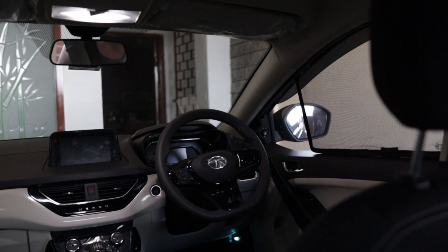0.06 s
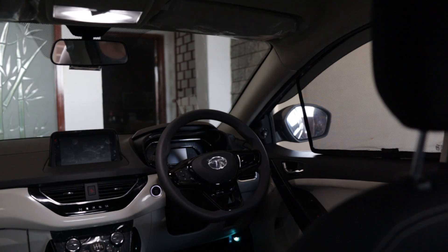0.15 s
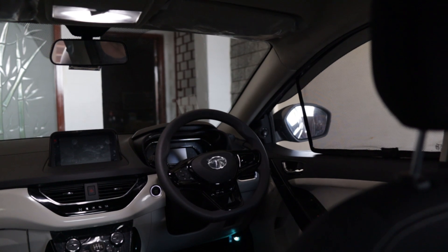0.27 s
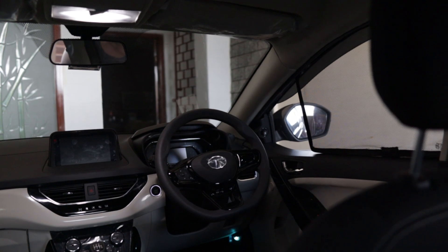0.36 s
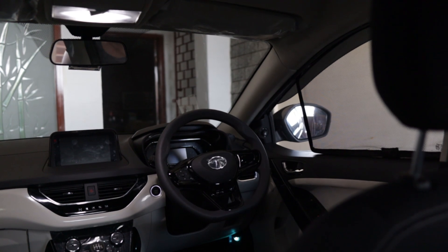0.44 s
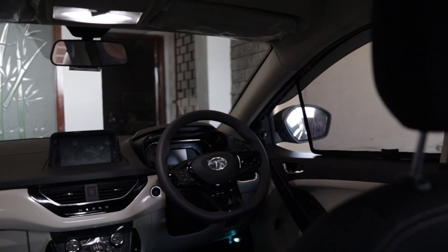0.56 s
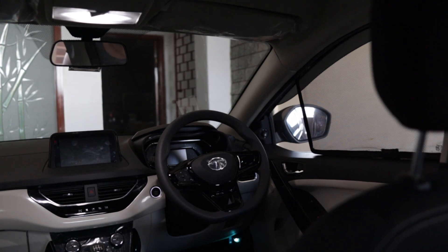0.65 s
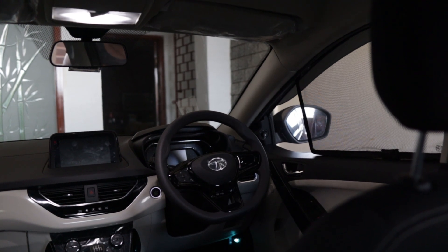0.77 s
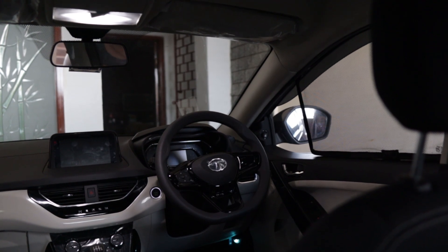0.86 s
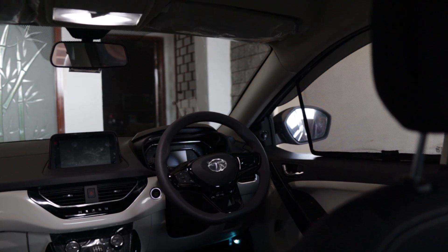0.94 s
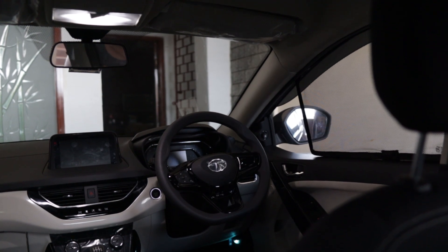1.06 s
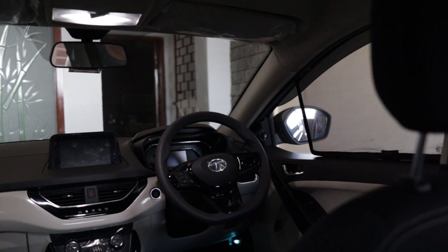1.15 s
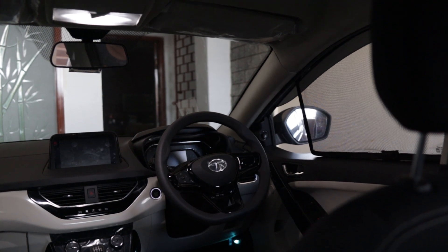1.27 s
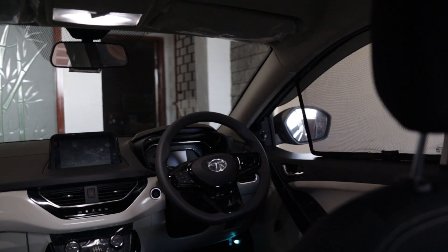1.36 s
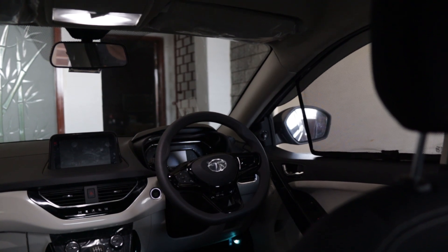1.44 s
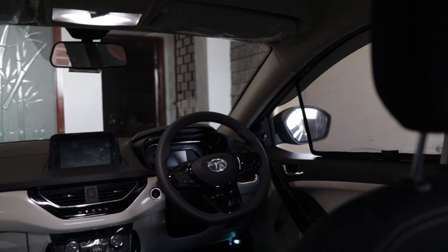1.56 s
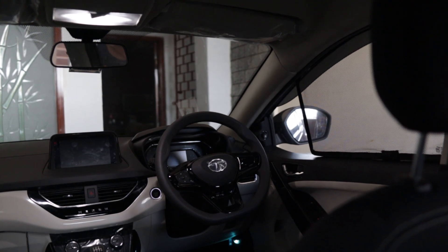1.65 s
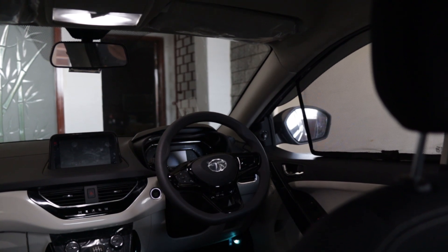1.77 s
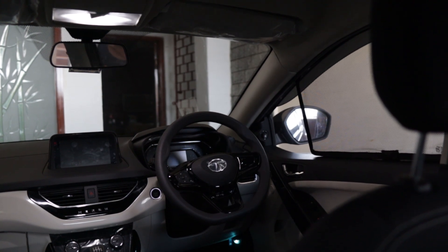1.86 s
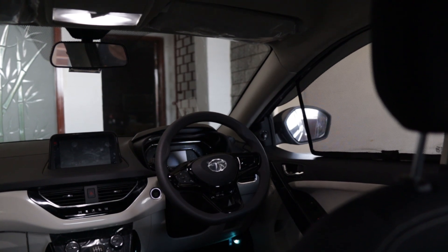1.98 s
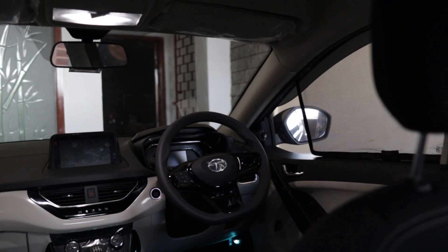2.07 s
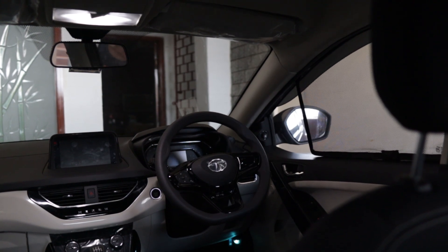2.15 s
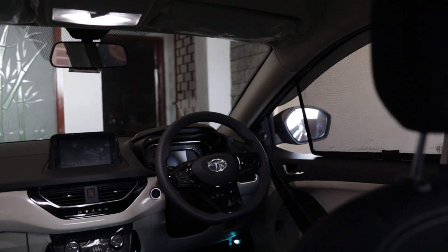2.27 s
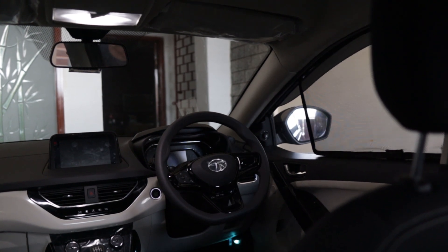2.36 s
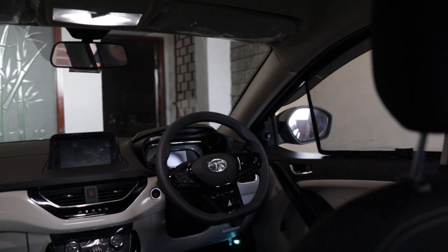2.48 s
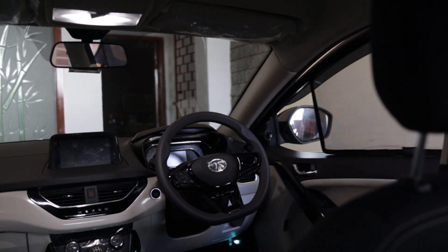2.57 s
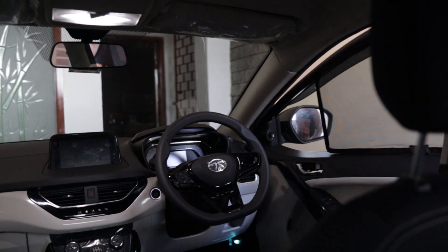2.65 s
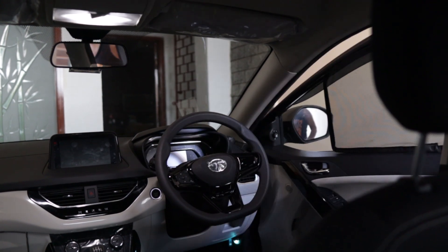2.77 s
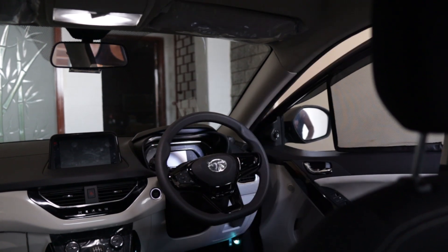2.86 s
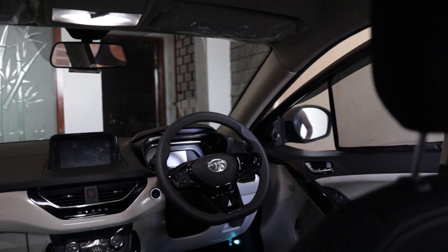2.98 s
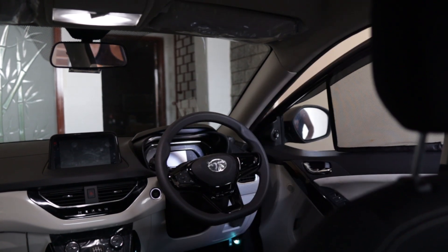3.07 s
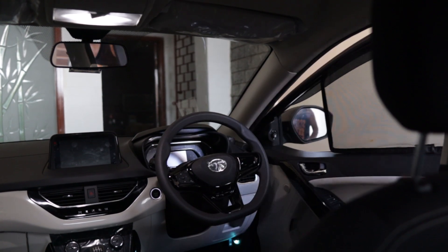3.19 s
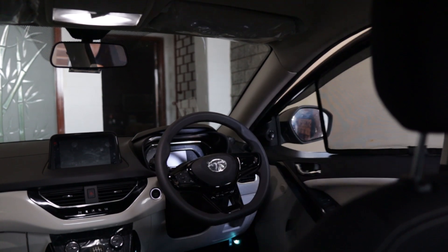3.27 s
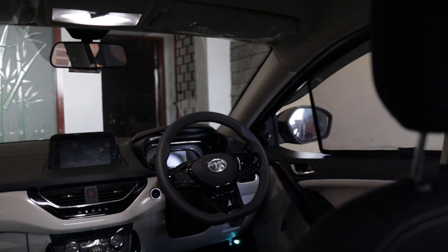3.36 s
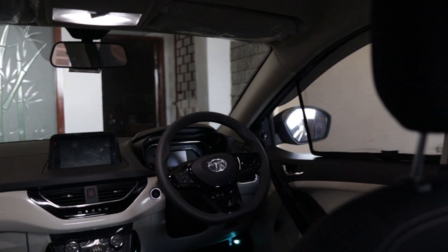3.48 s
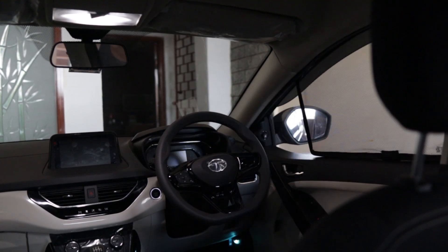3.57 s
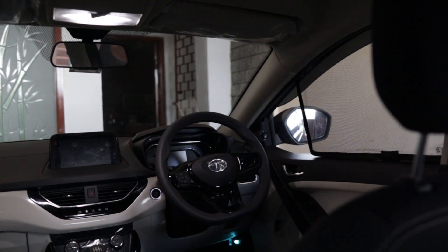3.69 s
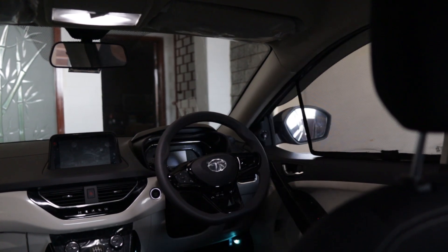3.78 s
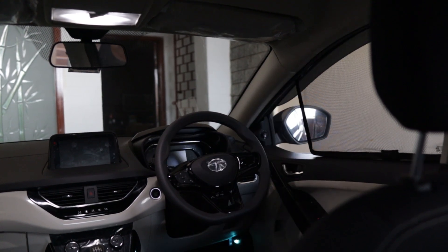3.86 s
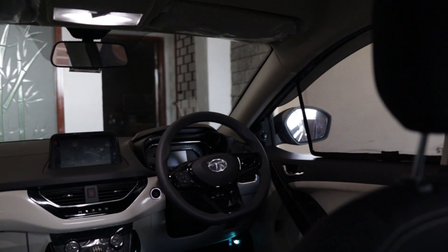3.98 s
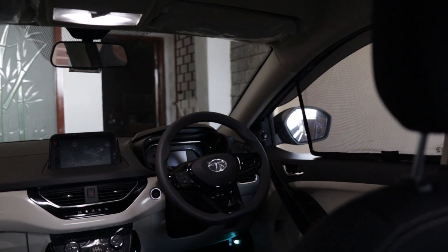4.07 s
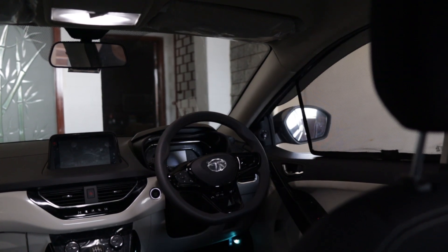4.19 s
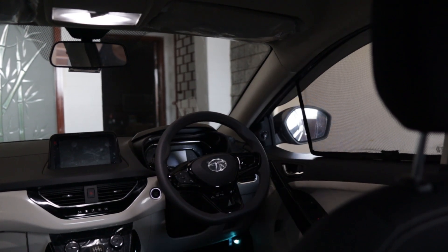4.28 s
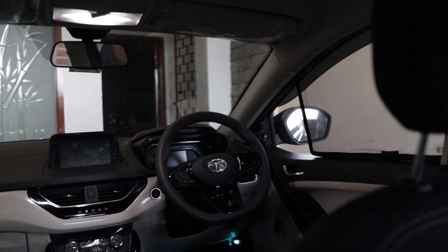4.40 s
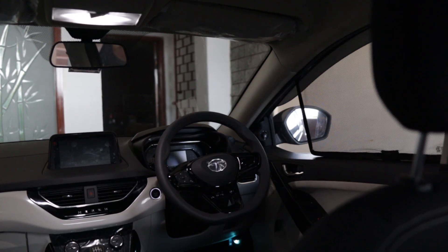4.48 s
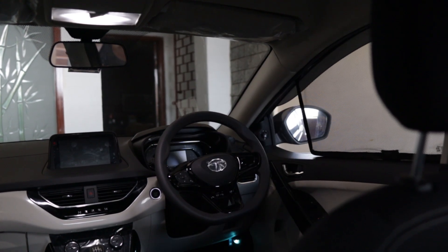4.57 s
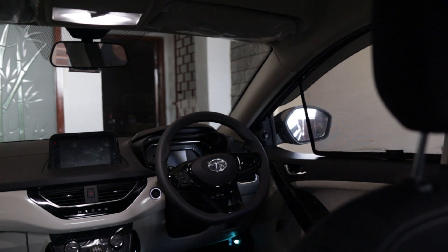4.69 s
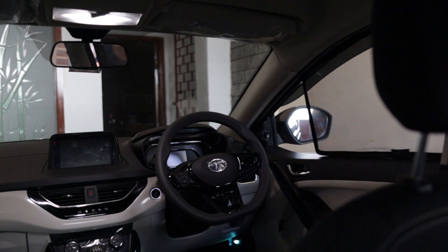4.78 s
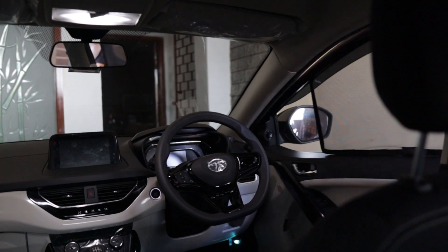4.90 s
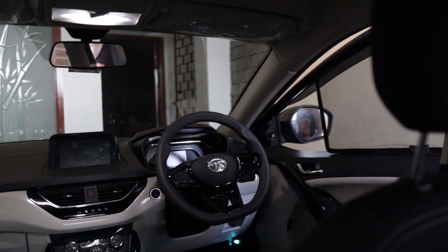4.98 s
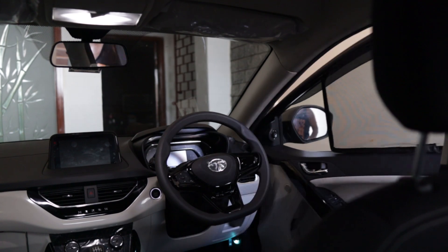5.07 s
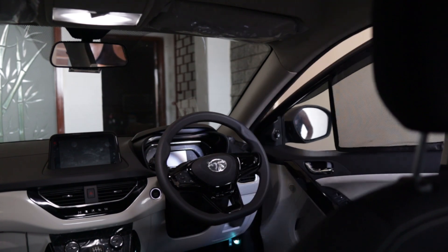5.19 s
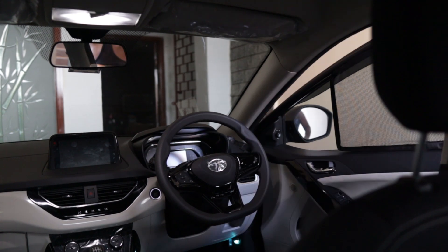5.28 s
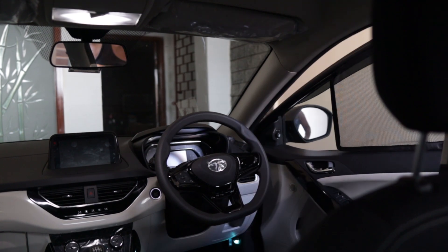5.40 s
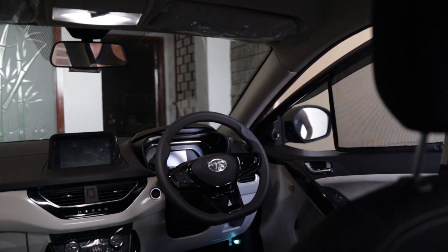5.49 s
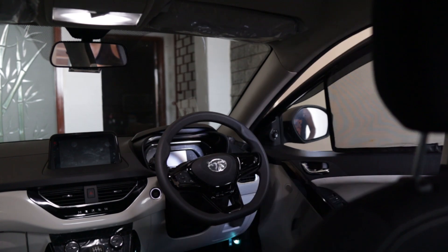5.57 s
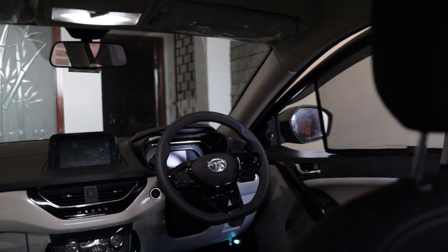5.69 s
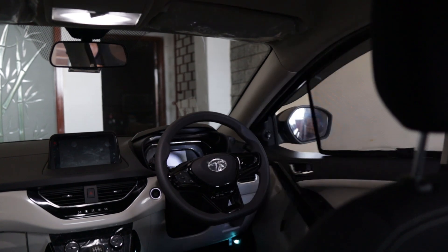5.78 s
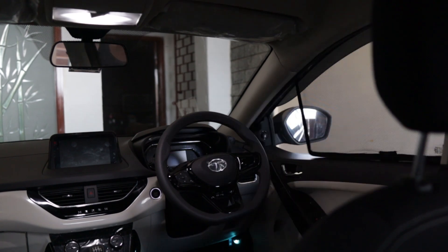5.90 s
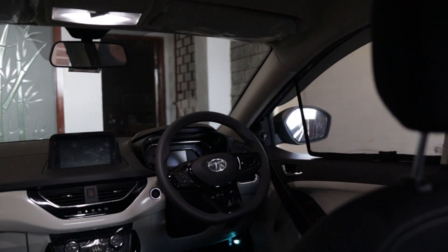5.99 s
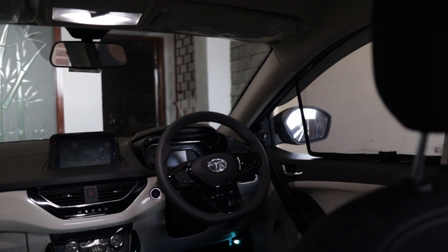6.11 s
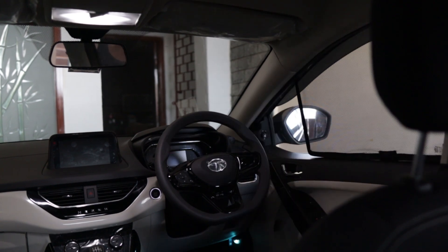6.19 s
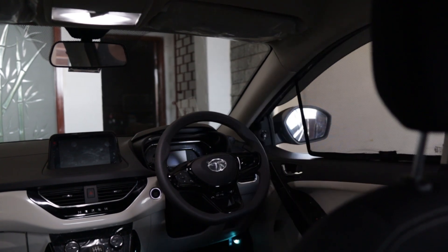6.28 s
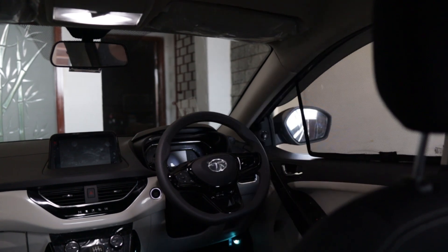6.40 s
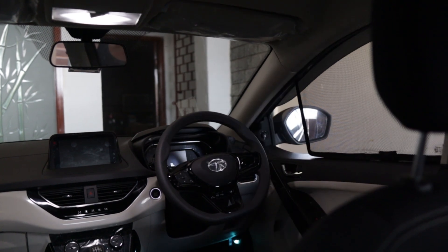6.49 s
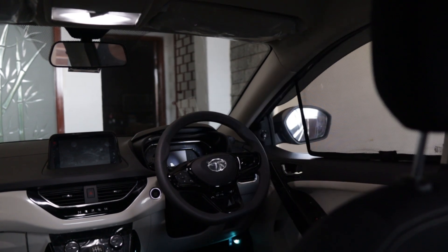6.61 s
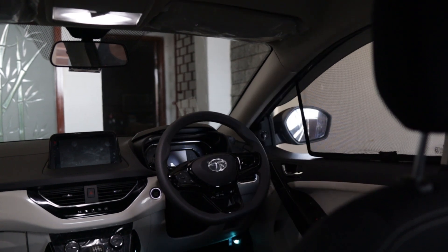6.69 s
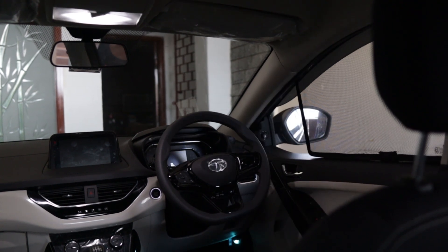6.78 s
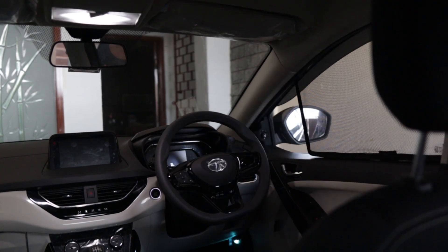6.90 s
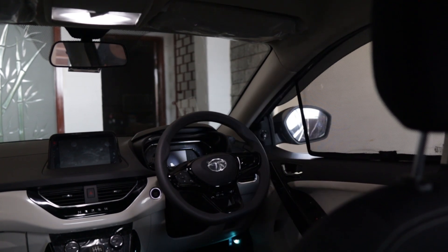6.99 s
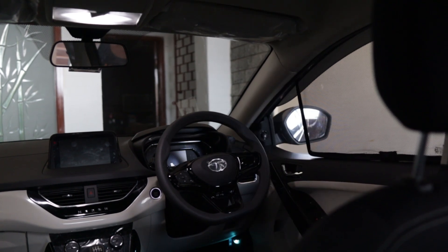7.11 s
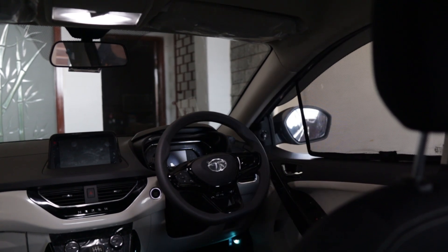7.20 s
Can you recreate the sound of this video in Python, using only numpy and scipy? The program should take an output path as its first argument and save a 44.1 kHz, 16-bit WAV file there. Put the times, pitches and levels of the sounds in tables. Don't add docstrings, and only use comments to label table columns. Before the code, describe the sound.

The microphone sits inside a small, padded parked car. At 0 s the end of an earlier door slam thuds and rattles lightly, its low boom fading within about half a second. Quiet cabin hum and faint hiss remain until 2.1 s, when soft handle knocks and seal bumps begin; around 2.4 s the latch releases with a dull clunk and faint street murmur enters. Small bumps continue to 3.3 s. At 3.6 s the door slams: clustered hard metallic impacts, deep body thump, brief panel ring and a loose rattle, over by about 4 s. Handle and latch clunks return at 4.6-4.9 s, with gentle opening bumps and slightly clearer murmur from 5.1 s. At 6.0 s a harder slam cracks and booms, distorting flatly, followed by rapid rattling until 6.3 s and a low fading rumble. Soft, muffled knocks come at 6.9 and around 7.15 s.

```python
import sys
import numpy as np
from scipy import signal
from scipy.fft import rfft, irfft
from scipy.io import wavfile
from scipy.ndimage import uniform_filter1d

SR = 44100
rng = np.random.default_rng(int(sys.argv[2]) if len(sys.argv) > 2 else 0)


def gain_from_decibels(decibels):
    exponent = np.asarray(decibels, float) / 20
    return 10 ** exponent


def inscribe(sig):
    pcm = np.round(np.clip(np.atleast_2d(sig).T, -1, 1) * 32767)
    wavfile.write(sys.argv[1], SR, pcm.astype(np.int16))


N = 319725

# (frequency [Hz], level [dB])
SNAP = [(2200, -10), (3000, -5), (4400, -9), (5500, -14.5), (7000, -28)]


def evened(x):
    return x / np.sqrt(np.mean(x ** 2) + 1e-20)


def peaked(x):
    return x / abs(x).max()


def add(mix, s, sound):
    at = round(s * SR)
    part = mix[max(at, 0):][:len(sound) + min(at, 0)]
    part += sound[max(-at, 0):][:len(part)]


def colour(x, points, edge_db=-14):
    hz, db = np.transpose(points)
    octave = np.log2(np.fft.rfftfreq(len(x), 1 / SR) + 1)
    known = np.log2(hz)
    outside = abs(octave - np.clip(octave, known[0], known[-1]))
    gain = gain_from_decibels(np.interp(octave, known, db) + edge_db * outside)
    return irfft(rfft(x) * gain, len(x))


def resonate(x, hz, width):
    pole = np.exp((2j * hz - width) * np.pi / SR)
    return 2 * signal.lfilter([1 - abs(pole)], [1, -pole], x).real


def modes(x, table):
    return sum(gain_from_decibels(db) * evened(resonate(x, hz, width)) for hz, width, db in table)


def rung(hits, table):
    out = 0
    for hz, width, db in table:
        once = resonate(hits, hz, width)
        out = out + gain_from_decibels(db) * peaked(resonate(once, hz, 3.4 * width))
    return out


def strike(t, rise, t60, bend=1.0):
    swell = (1 - np.exp(-t / rise)) ** 2
    return peaked(swell * gain_from_decibels(-60 * (t / t60) ** bend))


def spray(t, grit_db=1.5):
    grit = rng.exponential(1, len(t) // 32).repeat(32)
    return rng.standard_normal(len(t)) * gain_from_decibels(grit_db * grit)


def burst(x, shape):
    shaped = x * shape
    return shaped * np.linalg.norm(shape) / np.linalg.norm(shaped)


def knocks(table, bright, rise, ring_db, ring_width, edge_db, octave_db=0.0, bend=1.0):
    # (frequency [Hz], level [dB])
    dull = [(200, 8.5), (350, 0.5), (600, -0.5), (900, -6.5)]
    middle = [(800, 0.5), (1300, 3), (1800, 2), (2600, -8)]
    out, t = np.zeros(N), np.arange(8192) / SR
    for s, db, middle_db, treble_db, hz, t60 in table:
        hits = spray(t)
        ring = [(hz, ring_width, ring_db + octave_db * np.log2(hz / 400))]
        sound = rung(hits * strike(t, rise, 0.7 * t60), ring)
        parts = (-7.0, dull, 1), (middle_db - 9.5, middle, .9), (treble_db - 7.5, bright, .8)
        for part_db, tone, length in parts:
            shape = strike(t, rise, length * t60, bend)
            sound = sound + gain_from_decibels(part_db) * burst(colour(hits, tone, edge_db), shape)
        add(out, s - rise, gain_from_decibels(db) * sound)
    return out


def slams():
    # (time [s], peak [dB], middle re peak [dB],
    # treble re peak [dB], ringing part [Hz])
    first = [(0.0, -22, -1, -21, 360), (0.016, -30, 1, -1, 348), (0.05, -19, -2, -12, 343),
             (0.083, -17.5, -26, -17, 734), (3.575, -29, -11, -24, 342), (3.588, -16, -6, -42, 845),
             (3.601, -5, -9, -36, 503), (3.61, -3.5, -5, -22, 450), (3.626, -4, 9, -3.5, 1410),
             (3.633, -2, 2, -13, 426), (3.649, -13, -19, -35, 600), (3.674, -4.5, -4.5, -16, 1020),
             (3.701, -21, 4, -8, 342), (3.726, -8, -11, -14, 330), (3.738, -29, 3, 2, 603),
             (3.772, -29.5, -8, 4.5, 342), (3.79, -34, 2, 7.5, 358), (3.861, -16, -25, -19, 344),
             (3.876, -26.5, -14, -6, 342), (3.895, -45.5, -16, 13, 383)]
    second = [(5.977, -26, -16, -24, 700), (5.986, -23, 1.5, -29, 825), (5.998, -3.5, -5.5, -32, 524),
              (6.007, -3.5, -4.5, -28, 544), (6.019, -1, 9.5, -4.5, 434), (6.029, 3, -6, -15, 410),
              (6.045, 6.5, -9, -14.5, 484), (6.066, -3.5, -29, -17, 340), (6.075, -9, -26, -28, 404),
              (6.139, -9.5, -25, -15.5, 663), (6.2, -30, 3, 1, 380), (6.279, -23, -31, -12, 353)]
    # (frequency [Hz], level [dB])
    tick = [(2200, 5), (3000, 0.5), (5000, 4), (8500, -3.5), (11000, -18.5), (16000, -30)]
    # (frequency [Hz], width [Hz], level [dB])
    skin = [(396, 14, -16), (416, 36, -3.5), (524, 5.6, -4), (585, 48, 2), (820, 36, 2.5), (1020, 12, 2.5),
            (1350, 64, -10), (1830, 62, -8.5), (2195, 28, -17)]
    t60_s = 0.059
    blows = knocks([(*row, t60_s) for row in first + second], tick, rise=.004, ring_db=-10.0,
                   ring_width=120.0, edge_db=-14.5, octave_db=-0.5, bend=1.42)
    return blows + sum(gain_from_decibels(db + 2.5) * resonate(blows, hz, width) for hz, width, db in skin)


def thumps(sag=0.15, bend=1.09):
    # (time [s], peak [dB], pitch [Hz], t60 [s])
    blows = [(0.001, -3.5, 49.2, 0.057), (0.045, -7, 40.5, 0.13), (0.07, -11.5, 60, 0.05),
             (0.087, -11, 78, 0.14), (0.163, -26, 43.7, 0.19), (0.233, -20, 38, 0.13),
             (0.282, -29.5, 38, 0.37), (3.619, 1, 138.5, 0.08), (3.621, -1.5, 26, 0.18),
             (3.657, -9, 48, 0.066), (3.685, -2.5, 45, 0.11), (3.716, -1.5, 45, 0.13),
             (3.742, -25, 142, 0.081), (3.763, -7.5, 67, 0.05), (3.8, -8, 75.8, 0.22),
             (3.858, -8.5, 47.5, 0.11), (3.975, -19.5, 130.4, 0.091), (4.003, -16, 48, 0.092),
             (6.014, 4, 148.6, 0.093), (6.017, 2, 28, 0.27), (6.039, -5.5, 73.4, 0.28),
             (6.056, 6, 111, 0.074), (6.093, -14, 167, 0.092), (6.113, 0, 130.6, 0.046),
             (6.114, 3, 44.7, 0.17), (6.167, -2, 44.4, 0.092), (6.203, -11, 33.5, 0.085),
             (6.242, -10.5, 38.5, 0.09)]
    # (time [s], peak [dB], pitch [Hz], t60 [s])
    bumps = [(2.094, -28, 86, 0.16), (2.148, -39, 76.4, 0.095), (2.277, -16.5, 93.4, 0.19),
             (2.383, -18, 122, 0.081), (2.453, -18, 72.4, 0.078), (2.575, -12, 60, 0.1),
             (2.618, -19.5, 142.6, 0.068), (2.898, -28, 115, 0.18), (2.908, -34, 88.5, 0.13),
             (2.957, -28, 124, 0.15), (3.157, -26, 63.7, 0.38), (3.26, -33, 48.8, 0.14),
             (3.37, -33, 52.6, 0.067), (4.621, -26, 108, 0.093), (4.705, -26, 29.6, 0.11),
             (4.744, -22, 83, 0.073), (4.895, -13.5, 63, 0.098), (4.928, -19, 147.3, 0.08),
             (5.26, -32.5, 174.8, 0.3), (5.293, -22, 120.3, 0.15), (5.542, -27, 61.2, 0.29),
             (5.623, -32, 56.6, 0.25), (5.727, -34, 202, 0.15), (6.88, -24.5, 130.7, 0.39),
             (6.903, -18, 131, 0.05), (6.926, -14.5, 106, 0.059), (6.95, -28, 80.5, 0.32),
             (7.151, -18.5, 113, 0.091), (7.201, -28, 102, 0.097)]
    # (frequency [Hz], width [Hz], level [dB])
    panel = [(199.6, 60, 7.5), (246, 76, -1), (330, 100, -8)]
    out, t = np.zeros(N), np.arange(16384) / SR
    hard = [(*row, 0.0042, -12) for row in blows]
    soft = [(*row, 0.0048 + 0.017 * row[-1], -18.5) for row in bumps]
    for s, db, hz, t60, rise, slap_db in hard + soft:
        turns = np.cumsum(hz * (1 + sag * np.exp(-t / 0.0081))) / SR
        slap = rung(spray(t) * strike(t, 1.36 * rise, 0.64 * t60), panel)
        push = strike(t, rise, t60, bend) * np.sin(2 * np.pi * turns)
        stiffer = strike(t, rise, 1.37 * t60) * np.sin(2 * np.pi * 1.843 * turns)
        push += gain_from_decibels(-12.5) * stiffer
        add(out, s - .004, gain_from_decibels(db - 2.0) * (push + gain_from_decibels(slap_db - 6.5) * slap))
    return out


def clicks():
    # (time [s], peak [dB], t60 [s], brightness [dB per octave])
    contacts = [(0.011, -35, 0.092, 8), (0.053, -39, 0.08, -9), (0.064, -46, 0.07, 3),
                (0.086, -48, .06, 1.5), (0.123, -50, 0.05, -9), (2.242, -49, .04, -9),
                (2.393, -41, .04, -1.5), (2.43, -37, .05, -6), (3.606, -24, 0.073, -4.0),
                (3.626, -8.5, 0.045, 0.5), (3.63, -15, 0.039, 9), (3.637, -16, 0.04, -10),
                (3.645, -41, 0.03, -6), (3.675, -37, 0.039, .1), (3.724, -22.5, .06, 0),
                (3.734, -19.5, 0.028, 1), (3.769, -35, 0.055, 12), (3.818, -35, .05, 0),
                (3.863, -40, .05, .1), (6.004, -18.5, 0.06, -6), (6.019, -8.5, 0.026, 2),
                (6.025, 0, 0.018, -2.5), (6.031, -25, 0.03, -11), (6.048, -17, 0.016, -6),
                (6.052, -15, 0.02, 1.5), (6.06, -17, 0.021, 6), (6.067, -27, 0.03, -2),
                (6.079, -36, .04, .1), (6.138, -39, 0.043, 3), (6.146, -35, .07, 6), (6.198, -42, .07, 6),
                (6.24, -42, 0.08, -3.0), (6.278, -43, .04, 4.0)]
    # (frequency [Hz], level [dB])
    metal = [(1500, 5), (3000, 9), (6000, -2), (10000, -10.5), (15000, -38)]
    out, t = np.zeros(N), np.arange(4096) / SR
    for s, db, t60, slope_db in contacts:
        grains = spray(t, 2.0)
        tone = [(hz, tone_db + slope_db * np.log2(hz / 4000)) for hz, tone_db in metal]
        rise = 0.0004 + 0.014 * t60
        add(out, s - .001, gain_from_decibels(db - 6.5) * burst(colour(grains, tone), strike(t, rise, t60, 1.25)))
    return out


def rattles(upper_width=130.0, clean_db=13.5):
    # (time [s], peak [dB], upper mode re peak [dB], upper mode [Hz], top mode re peak [dB])
    rebounds = [(0.053, -17.5, -10, 2340, -22), (0.122, -25, -11, 1680, -35), (3.678, -11, -4, 2000, -26),
                (3.815, -16.5, -4, 1680, -44), (3.859, -36, -6, 1740, -19), (6.058, -16, 6, 1800, -7),
                (6.109, -14, -5, 1660, -34), (6.128, -20, -10, 1830, -24), (6.149, -11.5, -6, 1720, -37),
                (6.163, -33, -18, 1830, -13), (6.176, -41, 8, 1720, -7), (6.214, -36, -24, 1860, -2),
                (6.238, -19, -9, 1650, -31), (6.259, -23, -9, 1450, -27), (6.282, -38, -24, 1475, -25),
                (6.308, -36, -10, 1800, -32)]
    # (frequency [Hz], width [Hz], level [dB])
    rod_low = [(954, 116, 4.5), (1230, 130, -2)]
    rod_high = [(1540, 240, 3), (2280, 660, -7.5)]
    rod_top = [(3460, 170, 9)]
    out, t = np.zeros(N), np.arange(8192) / SR
    touch = gain_from_decibels(clean_db) * (np.arange(len(t)) == round(.002 * SR))
    for s, db, upper_db, hz, top_db in rebounds:
        chatter = spray(t, 0.82) * strike(t, 0.0018, 0.05, 0.75)
        hits = chatter + touch
        sound = rung(hits, rod_low)
        sound = sound + gain_from_decibels(upper_db) * rung(hits, rod_high + [(hz, upper_width, 0)])
        sound = sound + gain_from_decibels(top_db) * rung(hits, rod_top)
        add(out, s - .002, gain_from_decibels(db - 9.0) * sound)
    return out


def rings():
    # (time [s], peak [dB],
    # pitch [Hz], t60 [s])
    notes_struck = [(0.015, -11.5, 72.4, 0.11), (0.069, -24, 257, 0.15), (0.05, -31, 376, 0.25),
                    (0.199, -30, 62, 0.34), (0.1, -22, 73.3, 0.22), (0.028, -18, 66, 0.079),
                    (0.27, -24, 44.7, 0.22), (0.42, -36, 76.6, 1), (1.15, -42, 74.3, 1.1),
                    (2.581, -45, 395, 0.048), (2.585, -42, 890, 0.048), (2.59, -24, 193, 0.14),
                    (3.575, -31, 91, 0.055), (3.69, -12, 144, 0.16), (0.55, -44, 246, 1.1),
                    (1.55, -43, 70, .8), (3.1, -41, 202, 0.65), (6.55, -41, 187, 0.62),
                    (6.601, -48, 381, 0.59), (3.64, -7, 200, 0.053), (3.865, -32, 696, 0.075),
                    (4.9, -38, 865, 0.043), (4.899, -35, 252, 0.067), (6.135, -17.5, 634, 0.084),
                    (6.901, -22, 200, 0.15), (3.626, -3, 1347, 0.066), (3.628, -11, 1966, 0.046),
                    (3.64, -9, 371, 0.097), (3.672, -6.5, 188, 0.085), (3.728, -14, 255.4, 0.27),
                    (3.735, -18, 770, 0.06), (3.761, -28, 70, 0.37), (3.812, -25, 371, 0.11),
                    (3.816, -27, 247, 0.059), (3.864, -21, 253, .09), (3.9, -23, 81, 0.27),
                    (3.978, -21, 249, 0.068), (3.98, -28, 440, 0.063), (4.893, -28, 70, 0.061),
                    (6.021, -5.5, 1017, 0.031), (6.02, -4.5, 1374, 0.076), (6.024, -9, 1965, 0.059),
                    (6.03, -6.5, 406.7, 0.23), (6.095, -21.5, 373, 0.38), (6.25, -31, 620, 0.12),
                    (6.249, -23, 368, 0.066), (6.331, -22, 68, 0.22), (6.401, -25, 35.6, .5),
                    (6.48, -32, 192, .15), (6.491, -35, 44, 0.18),
                    (0.053, -31, 1600, 0.029), (0.053, -30.5, 2500, 0.043), (0.126, -47, 2250, 0.035),
             (2.245, -52, 2270, .03), (3.573, -32, 50, .09), (3.677, -22, 1700, .03),
             (3.678, -23, 2400, .03), (3.603, -17.5, 850, .06), (3.63, -17, 840, 0.045),
             (5.998, -18, 817, 0.032), (6.004, -14, 576, .07), (6.11, -26, 1786, .04),
             (6.13, -34, 1100, .04), (6.128, -29, 1600, 0.027), (6.152, -27, 1800, .04),
             (6.161, -27.5, 1700, 0.026), (6.212, -43, 3465, 0.098), (6.24, -38, 2200, .03),
             (6.262, -41, 2200, 0.036), (6.08, -4.5, 92, 0.061), (6.19, -18.5, 30.3, 0.62),
             (3.615, -10.5, 285, 0.084), (6.022, -14, 2200, 0.032), (0.127, -41, 1450, 0.032),
             (6.25, -38, 1500, 0.044), (0.15, -25, 45, 0.37), (0.18, -29.5, 74.6, 0.46),
             (6.061, -3, 49, 0.12)]
    out, t = np.zeros(N), np.arange(16384) / SR
    for s, db, hz, t60 in notes_struck:
        shape = strike(t, 0.0008 + 0.21 / hz, t60, 1.12)
        add(out, s - .002, gain_from_decibels(db) * shape * np.sin(2 * np.pi * hz * t))
    return out


def latch():
    releases = [(2.393, -33.5, 4, -5, 1350), (2.408, -18.5, -12, -32, 553), (2.427, -18, -11.5, -17, 358),
                (2.444, -22.5, -25, -22, 370), (2.474, -35.5, -9, -13, 342), (4.716, -36, 6, 4, 626),
                (4.732, -18.5, -13, -46, 520), (4.751, -16.5, -11.5, -10.5, 323),
                (4.769, -28, -14, -33, 404), (5.261, -27.5, -18, -19, 396), (5.284, -24.5, -22, -32, 377),
                (5.318, -33, -15, -25, 352), (6.915, -23.5, -16, -21, 604), (2.24, -28, -11, -25, 377)]
    t60_s = 0.05
    return knocks([(*row, t60_s) for row in releases], SNAP, rise=0.0034, ring_db=-6.0,
                  ring_width=60.0, edge_db=-19.0, bend=1.7)


def taps():
    # (time [s], peak [dB], ringing part [Hz], t60 [s])
    touches = [(2.271, -28, 356, 0.088), (2.582, -32.5, 608, 0.12), (2.695, -37, 378, 0.051),
               (2.88, -33.5, 386, 0.15), (2.949, -31, 387, 0.048), (3.953, -34.5, 606, 0.4),
               (3.98, -25, 777, 0.063), (4.608, -27.5, 375, 0.067), (4.819, -48, 390, 0.057),
               (4.899, -28, 616, 0.13), (5.051, -43, 394, 0.19), (5.225, -36.5, 388, 0.16),
               (6.882, -30.5, 380, 0.057), (6.914, -51, 335, 0.11), (6.919, -25.5, 727, 0.015),
               (7.123, -32, 577, 0.098), (7.14, -55, 401, 0.06), (7.17, -41, 340, 0.061)]
    middle_db, treble_db = -20, -21
    soft = [(s, db, middle_db, treble_db, hz, t60) for s, db, hz, t60 in touches]
    return knocks(soft, SNAP, rise=.0065, ring_db=-1.5, ring_width=43.0, edge_db=-27.0, octave_db=-1.0)


def cabin(x, wet_db=-14.0, t60=0.11):
    t = np.arange(8192) / SR
    signs = rng.choice([-1., 1.], len(t))
    sparse = (rng.random(len(t)) < .06) * (t > .003)
    echoes = signs * sparse * gain_from_decibels(-60 * t / t60)
    echoes = signal.lfilter([1], [1, -.6], echoes)
    return x + gain_from_decibels(wet_db) * signal.fftconvolve(x, echoes / np.linalg.norm(echoes))[:N]


def shake(steady=0.73):
    # (frequency [Hz], width [Hz], level [dB])
    body = [(20.2, 12, -9), (24.6, 13, -17), (38, 11.6, -4.5)]
    air = [(60, 30, 3), (76.6, 16.3, 2), (86, 35, -4)]
    panels = [(142, 10, 2.5), (192.2, 42, 3.5), (249.3, 46, 2), (347, 51, -4.5), (413, 23, -8),
              (487, 196, -9)]
    # (time [s], body [dB], cabin air [dB], panels [dB], t60 [s])
    jolts = [(-0.04, -23, -35, -33, 0.4), (0.1, -26.5, -31, -36.5, 1.17), (0.45, -47, -48, -43, 2.4),
             (1.02, -77, -52, -77, 1.4), (2.14, -42, -45, -62, 4), (2.39, -31.5, -36, -36, 1.2),
             (2.62, -44, -51, -61, 2.7), (2.88, -40, -53, -52, 0.79), (3.19, -45, -66, -62, 0.62),
             (3.62, -27, -33, -45, 0.75), (3.69, -32, -14, -16.5, 0.37), (3.78, -22, -27, -46, 0.3),
             (3.87, -36, -26, -32, 0.68), (4.06, -40, -63, -53, 1.3), (4.62, -51, -37, -45, 2.3),
             (4.79, -37, -50, -35.5, 0.68), (5.001, -61, -45, -47.5, 1.6), (5.19, -48, -37.5, -47, 1.3),
             (5.62, -47, -47, -62, 3.1), (6.02, -16, -44, -43, 1.36), (6.15, -20, -20, -25.5, 0.64),
             (6.31, -34, -32, -49, 0.79), (6.699, -41, -71, -40.5, 7.2), (7.05, -40, -37.5, -49, 2.2)]
    rise_s, rest_db = 0.0082, (-56, -60, -52)
    t, out = np.arange(SR) / SR, np.zeros(N)
    for k, table in enumerate((body, air, panels)):
        energy = np.full(N, gain_from_decibels(rest_db[k]) ** 2)
        for s, *kick_db, t60 in jolts:
            add(energy, s, (gain_from_decibels(kick_db[k]) * strike(t, rise_s, t60)) ** 2)
        noise = rng.standard_normal(N)
        sway = 0
        for hz, width, db in table:
            once = resonate(noise, hz, width)
            sway = sway + gain_from_decibels(db) * evened(resonate(once, hz, 2 * width))
        power = abs(uniform_filter1d(sway ** 2, 1800)) + 0.099
        levelled = sway / power ** (steady / 2)
        out += np.sqrt(energy) * evened(levelled)
    return out


def floor():
    # (opens [s], shuts [s], street level [dB])
    door_open = [
        (2.45, 3.6, -64),
        (5.09, 6.0, -60.5),
    ]
    # (frequency [Hz], level [dB])
    street_tone = [(400, -6), (700, -2), (1200, -1.5), (2200, -9.5)]
    # (frequency [Hz], level [dB per Hz])
    still_tone = [(15, -55), (25, -43), (43, -30), (55, 1.5), (75, -1), (107, -20.5), (239, -6),
                  (359, -8.5), (509, -11), (566, -9), (614, -14.5), (970, -18.5), (1140, -22.5),
                  (1240, -22), (15500, -27)]
    # (frequency [Hz], width [Hz], level [dB])
    hum = [(202, 44, -48), (966.4, 7.4, -63.5)]
    swing_s, shut_db, still_db = 0.12, -62.5, -45.5
    t = np.arange(N) / SR
    gain = gain_from_decibels(shut_db)
    for opens, shuts, db in door_open:
        gain = gain + gain_from_decibels(db) * np.clip((t - opens) / swing_s, 0, 1) * (t < shuts)
    street = gain * evened(colour(rng.standard_normal(N), street_tone))
    still = gain_from_decibels(still_db) * evened(colour(rng.standard_normal(N), still_tone))
    return still + street + modes(rng.standard_normal(N), hum)


def scene():
    impacts = gain_from_decibels(-7.0) * slams() + latch() + taps() + rattles()
    mix = cabin(impacts) + cabin(clicks())
    mix = mix + thumps() + rings() + shake() + floor()
    return mix[None]


def band_limit(x):
    return signal.sosfilt(signal.butter(12, 15640, fs=SR, output="sos"), x)


def record(dry):
    power = signal.lfilter([1 / 9000], [1, 1 / 9000 - 1], dry ** 2)
    power_db = 10 * np.log10(power + 1e-9)
    ducked = dry * gain_from_decibels(-.3 * np.maximum(power_db + 15.0, 0))
    return band_limit(np.clip(ducked, -1, 1))


dry = scene()
out = record(dry)
inscribe(out)
```